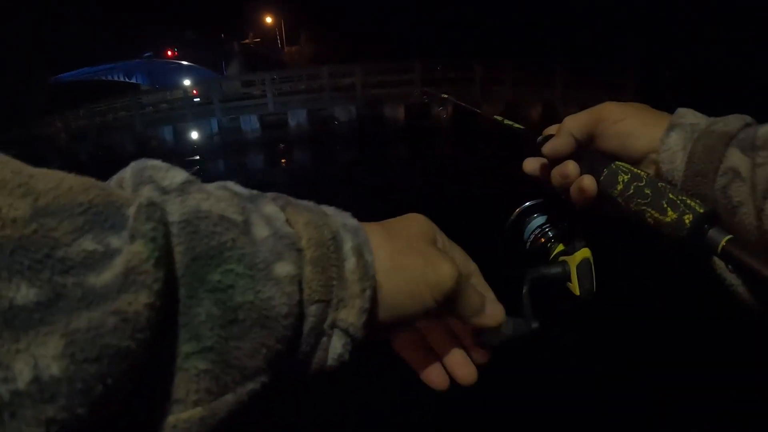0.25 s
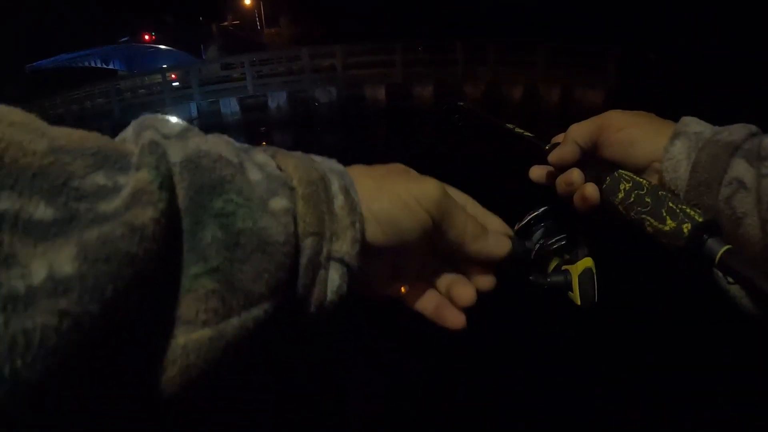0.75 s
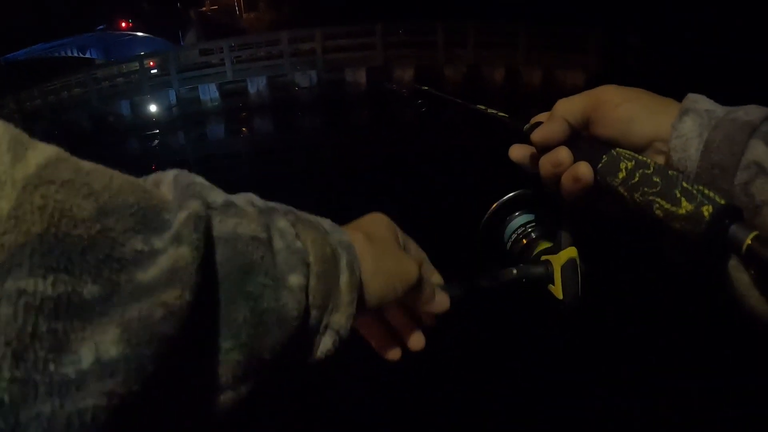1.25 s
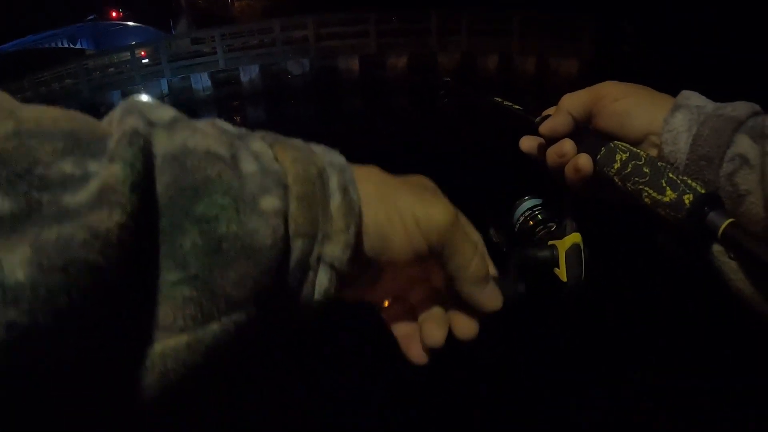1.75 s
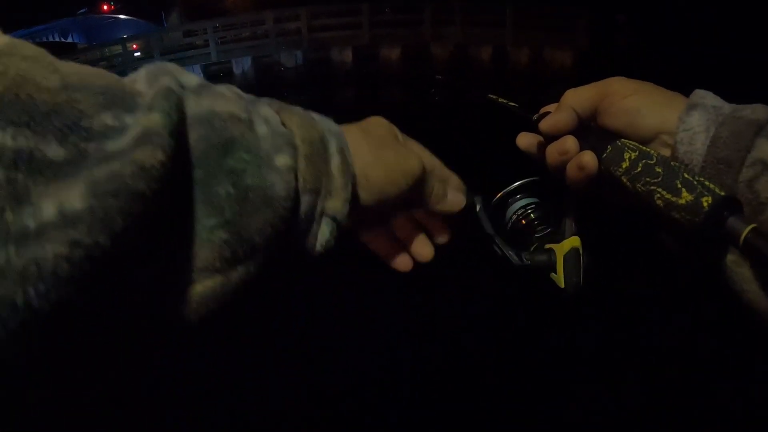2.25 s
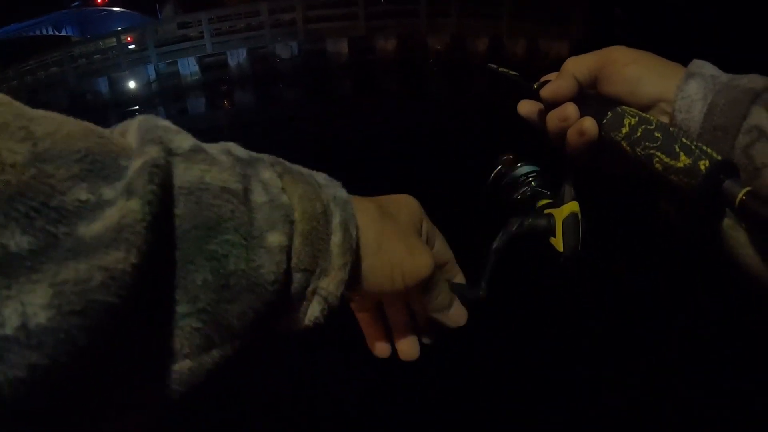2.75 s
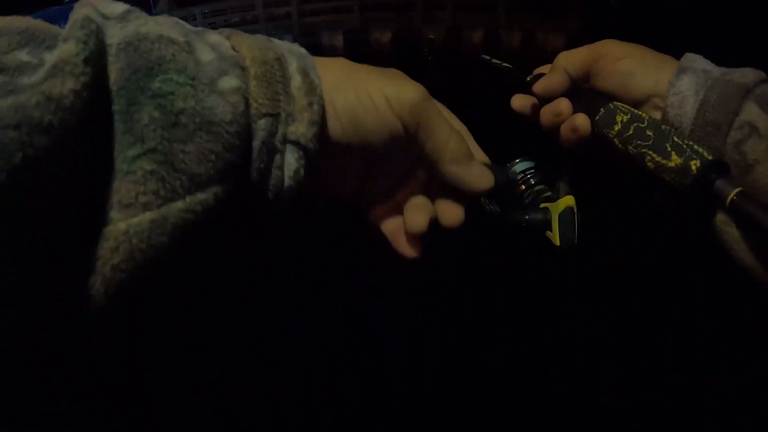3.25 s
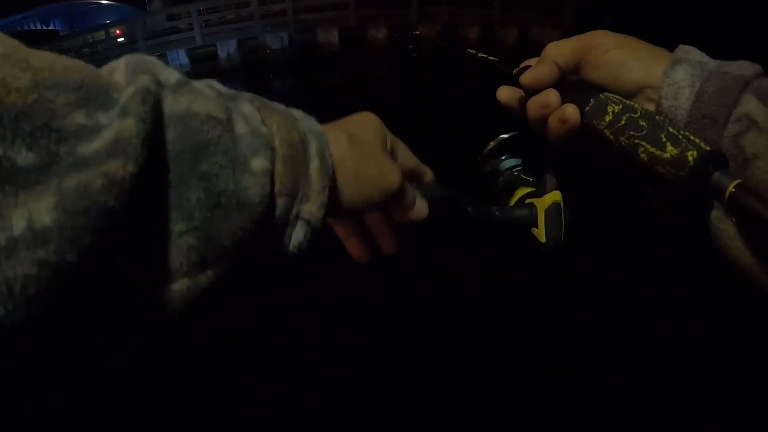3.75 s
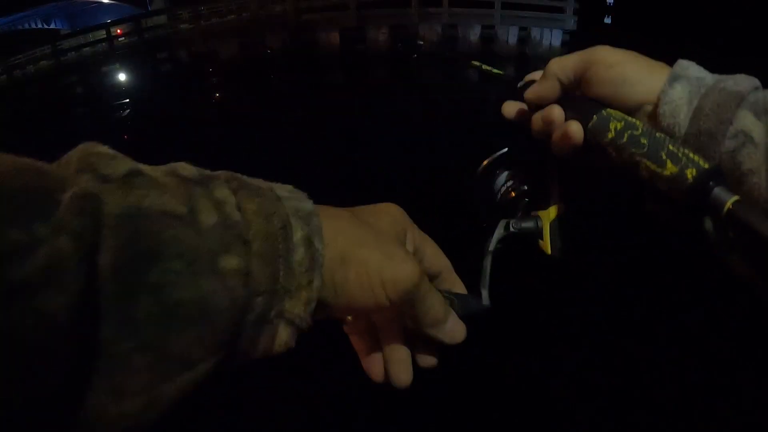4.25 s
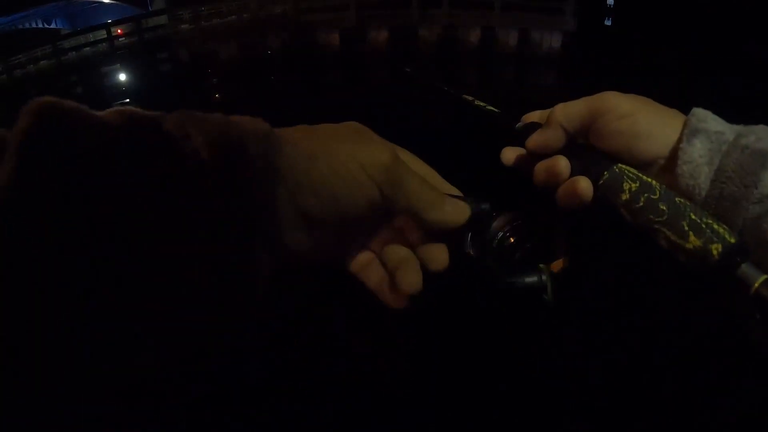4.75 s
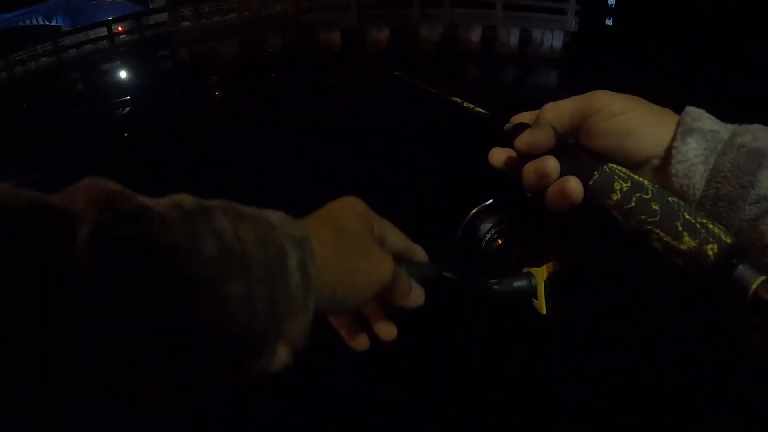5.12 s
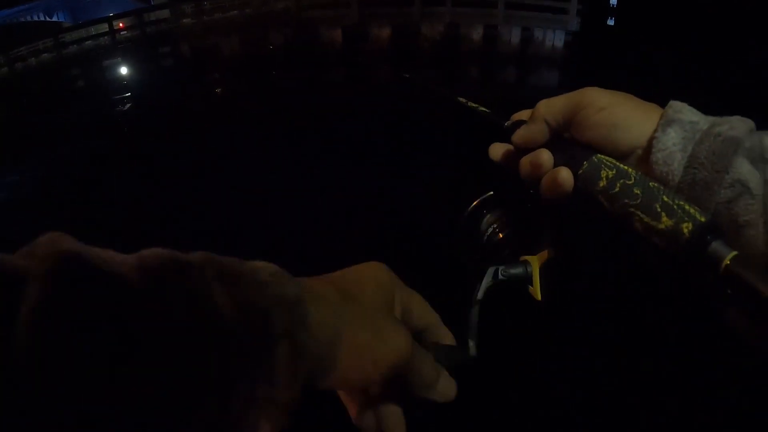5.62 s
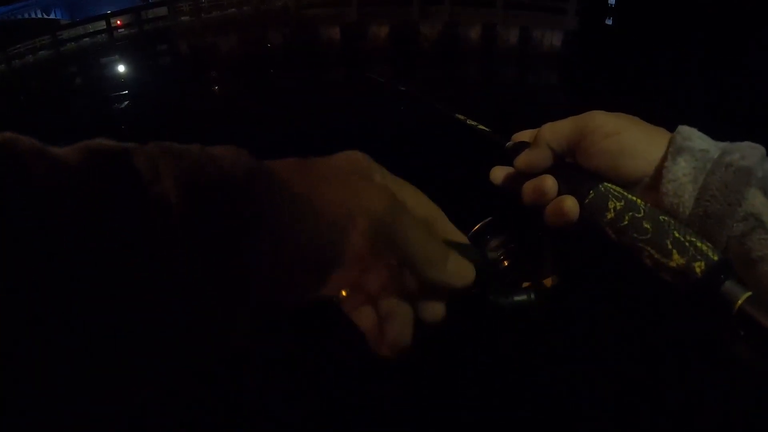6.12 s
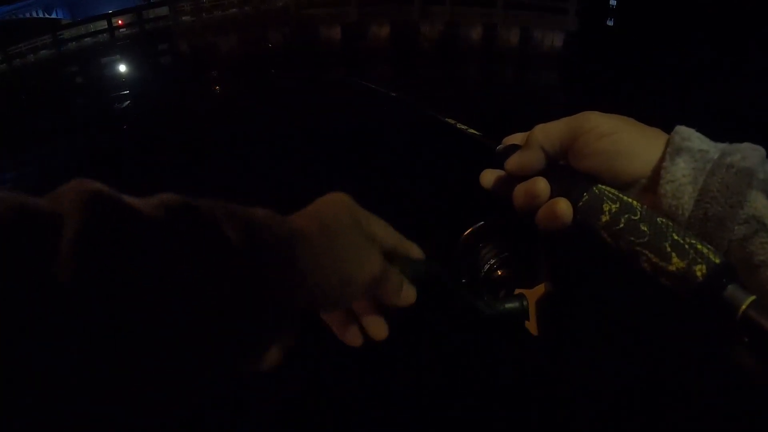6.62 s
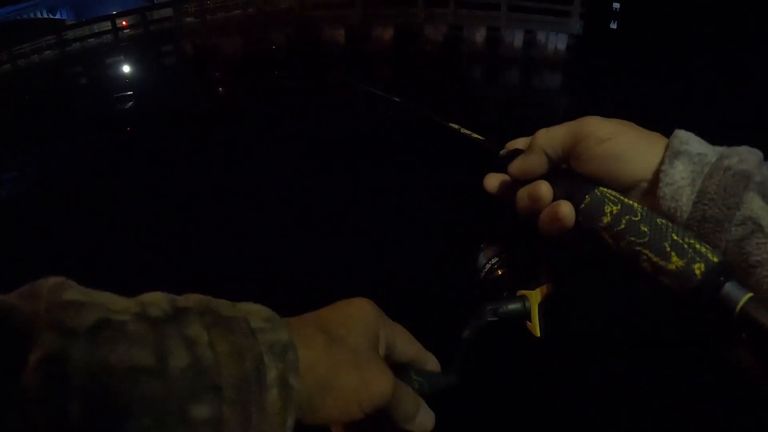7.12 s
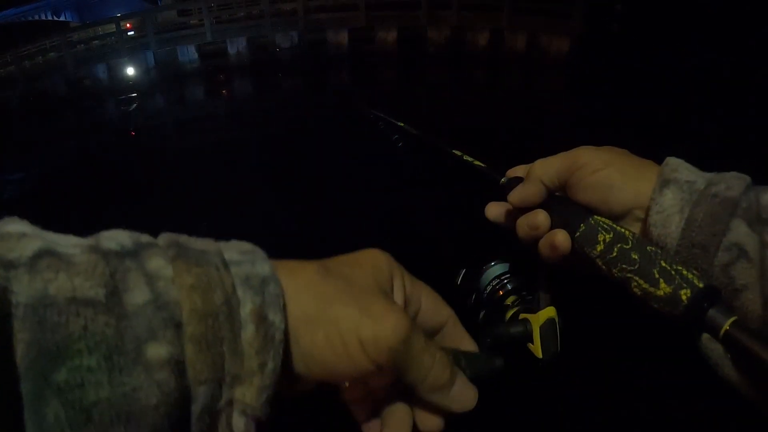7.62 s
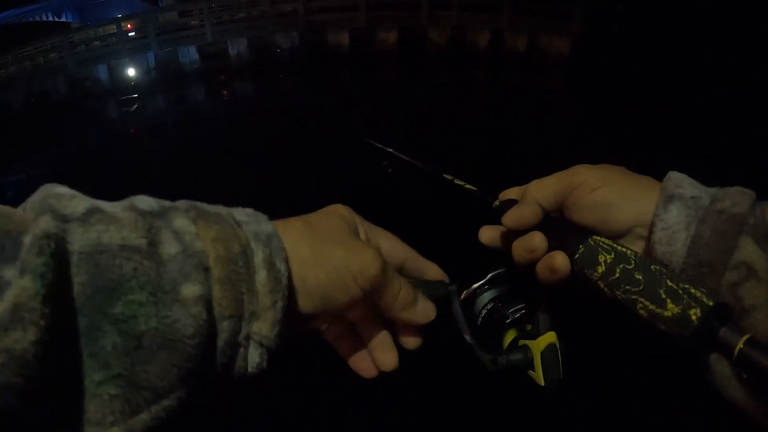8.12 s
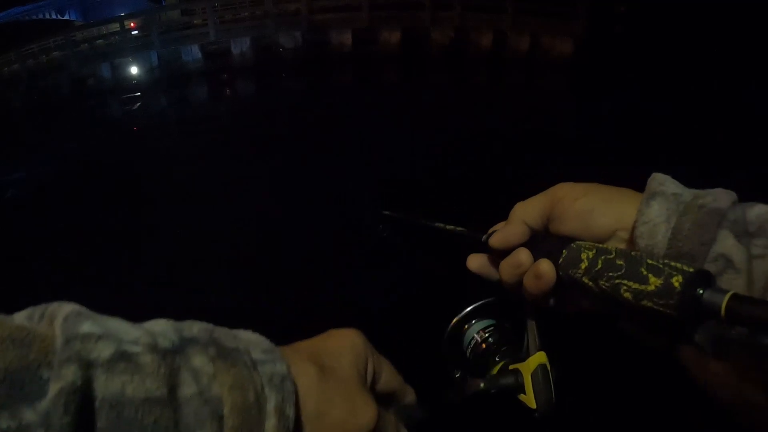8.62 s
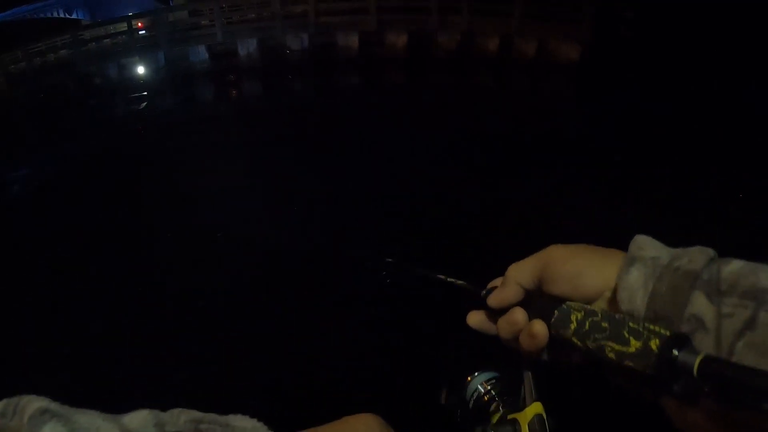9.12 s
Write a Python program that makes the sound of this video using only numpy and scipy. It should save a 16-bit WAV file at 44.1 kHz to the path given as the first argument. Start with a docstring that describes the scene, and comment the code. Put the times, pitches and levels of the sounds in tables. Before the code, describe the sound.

Outdoors at night near water, heard from a microphone worn close to the hands. A faint distant bass rumble runs throughout. At 0-0.3 s a sleeve brushes softly; small dry clicks follow between 0.25 and 0.73 s, with a tiny stir of line near 0.66. At about 0.8 s the reel catches and a bright grainy rasp runs without stopping to the end near 9.4 s. It pulses with each rotor turn, four to five times a second at first, slowing to roughly three or four after 6 s. A hollow ring around 2 kHz is fuller at about 0.8-1.8, 3.1-4.6, 6-7.6 and after 9.2 s, thin between. Soft, very low bumps come irregularly, around 1, 2.3, 2.9, 4, 6.8, 7.5, 8.3, 8.6 and 9.2 s, with lumpy arm rumble. From about 7.8 s a low humming whirr creeps up underneath.

```python
"""Winding a spinning reel

A fishing reel is wound steadily at night by the water, close to a microphone worn on the body.
The line rasps onto the spool: noise from tiny slips, with peaks and dips that sweep at every rotor turn.
A hollow ring, made by resonant shaping of similar slips, comes and goes as the spool slides in and out.
Filtered noise gives the far rumble, the arm's sway, a sleeve and a late low whirr; decaying sines give
small clicks, and short swells of low sine give the soft bumps."""
import sys
import numpy as np
from scipy import signal
from scipy.io import wavfile
from scipy.ndimage import uniform_filter1d

SR = 44100
rng = np.random.default_rng(int(sys.argv[2]) if len(sys.argv) > 2 else 0)


def digitize_waveform(pressure):
    """Quantize a signal to 16-bit integers and store it at the path in sys.argv[1].

    Rows of a 2-D input are taken as channels; values are limited to [-1, 1].
    """
    field = np.atleast_2d(pressure).T
    bounded = np.clip(field, -1, 1)
    quanta = np.round(bounded * 32767).astype(np.int16)
    wavfile.write(sys.argv[1], SR, quanta)


N = 412776
TIME = np.arange(N) / SR
# the slow changes of the reel are counted from this moment
MIDWAY_S = 5


def gain_of(db):
    """Turns decibels into an amplitude factor."""
    return 10 ** (np.asarray(db) / 20)


def evened(x):
    """Scales to an rms (average strength) of 1."""
    return x / np.sqrt(np.mean(x ** 2) + 1e-20)


def read(points, hz):
    """Reads a curve over frequency, joined on a log-frequency axis, as a column."""
    f, value = np.transpose(points)
    return np.interp(np.log(hz + 1), np.log(f + 1), value)[:, None]


def follow(rows, t):
    """Reads the columns of a curve over time at the times t."""
    s, *columns = np.transpose(rows)
    return [np.interp(t, s, c) for c in columns]


def bells(rows, hz):
    """Adds up rounded peaks and dips in dB over frequency, as a column."""
    return sum(db * np.exp(-((hz - f) / width) ** 2) for f, width, db in rows)[:, None]


def spectra(x, size):
    """Cuts a sound into short overlapping spectra: frequencies in Hz, times in s, values."""
    return signal.stft(x, SR, nperseg=size, noverlap=size * 3 // 4)


def sound(z):
    """Joins short spectra back into a sound of rms 1."""
    size = 2 * (z.shape[-2] - 1)
    _, x = signal.istft(z, nperseg=size, noverlap=size * 3 // 4)
    return evened(x[..., :N])


def wander(count, size):
    """A slow random curve of rms 1, averaged twice over size steps."""
    once = uniform_filter1d(rng.standard_normal(count), size)
    return evened(uniform_filter1d(once, size))


def ports(z, hz, same, pan, lead=0):
    """Mixes two unrelated spectra into a partly alike left and right pair, as at two microphone ports."""
    likeness = np.clip(read(same, hz), 0, 1)
    # half of the level and phase difference goes to each side
    tilt = gain_of(read(pan, hz) / 2) * np.exp(.5j * lead)
    left = z[0] * tilt
    right = (np.sqrt(likeness) * z[0] + np.sqrt(1 - likeness) * z[1]) / tilt
    return np.array([left, right])


def reel_pair(z, hz):
    """Places the reel between left and right, differently at each frequency."""
    # how alike the two sides are: (frequency [Hz], likeness [0-1])
    reel_same = [(900, 0.42), (1400, 1), (2000, 1), (2400, 0.82), (2650, 0.22), (3100, 0.82), (5000, 0.94),
                 (5400, 0.13), (5800, 0.62), (7200, 1), (8200, 0.26), (10000, 0.23), (11000, 0.27),
                 (14000, .15)]
    # level difference: (frequency [Hz], left minus right [dB])
    reel_pan = [(900, -1.5), (2000, -1.5), (2600, -6), (3300, -2.5), (4500, -1), (5200, 0), (5500, -1.5),
                (6500, -5), (7500, 2.5), (9000, -4), (11500, 2.5), (14000, -1)]
    # phase difference: (frequency [Hz], lead of the left side [rad])
    reel_lead = [(900, -.6), (1400, -.5), (2000, -1.03), (2450, -1.4), (2750, -.1), (3300, -.4),
                 (4500, -.55), (5200, -.8), (5500, 0), (7000, -.2), (10500, -.5), (11500, .6), (14000, .3)]
    return ports(z, hz, reel_same, reel_pan, read(reel_lead, hz))


def slips(per_s, spread_db, smooth):
    """Friction: tiny slips of uneven size at random moments, over a smooth hiss."""
    size = gain_of(spread_db * np.minimum(rng.exponential(1, (2, N)), 4))
    size = size * rng.choice([-1, 1], (2, N))
    happens = rng.random((2, N)) < per_s / SR
    return evened(size * happens) + smooth * rng.standard_normal((2, N))


def winding(t, usual_turns_per_s=4):
    """The rotor's motion: turns done, and the speed in doublings above the usual one."""
    # progress of the winding: (time [s], turns done [turns])
    rotor = [(0.76, 0), (0.978, 1), (1.485, 4), (2.152, 7), (2.538, 9), (3.624, 14), (4.112, 16),
             (5.153, 21), (6.689, 27), (7.864, 31), (8.391, 33), (8.693, 34), (9.38, 36)]
    s, turns = np.transpose(rotor)
    speed = np.interp(t, (s[1:] + s[:-1]) / 2, np.diff(turns) / np.diff(s))
    return np.interp(t, s, turns), np.log2(speed / usual_turns_per_s)


def tension(stir_db, extra_db):
    """Gain of the line's friction: a brief stir, a pause, then it catches and any extra level dies away."""
    stir_s, stir_length_s = 0.657, 0.041
    catch_s, catch_rise_s, settle_s = .785, .017, .08
    stir = gain_of(stir_db) * np.exp(-((TIME - stir_s) / stir_length_s) ** 2)
    age = np.maximum(TIME - catch_s, 0)
    caught = np.minimum(age / catch_rise_s, 1) * gain_of(extra_db * np.exp(-age / settle_s))
    return stir + caught


def line_rasp(rasp_db=-45.5, flutter_db=0.68, patchy_db=3.0, crackle_db=1.8):
    """The line slips over roller and spool lip; the circling bail sweeps peaks and dips through its sound."""
    # basic colour of the rasp: (frequency [Hz], level [dB per Hz])
    rasp = [(300, -25), (900, -6), (1200, 2.5), (1700, 5.5), (2300, 9), (2750, 5.5), (3300, 8.3),
            (4300, 11.8), (4900, 16.2), (5800, 7.8), (7200, 10.4), (8100, -3.8), (12400, -14.3),
            (14200, -22.5)]
    # peaks and dips that stay put: (frequency [Hz], width [Hz], height [dB])
    body = [(1345, 60, 6), (1455, 45, -5), (1535, 40, 3), (2330, 170, 8), (2680, 130, -5),
            (5390, 230, -8.5), (9200, 400, -4), (9900, 250, 2), (11048, 195, -8), (12948, 177, -9)]
    # peaks and dips that pass in every turn: (place [turns, 0-1], length [turns], frequency [Hz],
    # glide [Hz per turn], width [Hz], height [dB])
    sweeps = [(0, .2, 1450, 0, 400, 3), (.93, .2, 2200, 0, 320, 4), (.95, .18, 2880, -290, 270, -8),
              (.49, .19, 3280, -150, 175, 10.5), (.81, .14, 3630, 800, 230, 8.5),
              (.04, .15, 3610, -470, 200, -8), (.78, .12, 4200, 660, 250, -7),
              (.58, .14, 4345, 0, 140, 4.5), (.46, .13, 4523, 50, 120, -4.8),
              (.99, .2, 4760, -2700, 560, 8), (.24, .11, 4925, -2200, 280, -8),
              (.45, .18, 5650, 460, 220, 8), (.97, .14, 5820, -190, 150, 8),
              (.47, .19, 6135, -150, 170, 7.3), (.86, .22, 6180, 4500, 650, -6.5),
              (.2, .3, 6460, 190, 170, -5.2), (.21, .12, 7180, -3500, 410, -9),
              (.78, .06, 7140, -1230, 500, -8), (.53, .1, 7490, -90, 280, -9), (.62, .2, 8700, 0, 250, 4),
              (.37, .15, 9900, -2500, 380, 4.5), (.52, .26, 11500, 0, 2500, 7)]
    # effect of winding faster: (frequency [Hz], change [dB per doubling of speed])
    speed_gain = [(1400, 11), (3400, 6), (4700, 22.5), (6400, -1.5), (10000, 4)]
    # slow change of colour: (frequency [Hz], change [dB per s])
    drift = [(1400, .5), (2300, 1), (3300, -0.38), (4000, 0.42), (4750, 1.73), (5300, 1.9), (5800, -1.3),
             (6400, -1.75), (7300, -1.14), (8000, -0.46), (10000, 0), (12500, -0.2)]
    # slow level changes besides those from the speed: (time [s], level [dB])
    rasp_level = [(0.97, -1.0), (1.32, 1.7), (1.93, -1.6), (2.14, 1.1), (2.75, 1.2), (2.97, -1.1),
                  (5.16, -0.2), (5.41, 1.3), (6.43, -0.8), (6.98, 1.4), (7.86, -0.6), (9.04, -0.2)]

    hz, t, z = spectra(slips(per_s=2200, spread_db=1.5, smooth=0.44), size=512)
    turn, speed = winding(t)
    colour = read(rasp, hz) + bells(body, hz)
    for place, length, f, glide, width, db in sweeps:
        # turns since the nearest passing, from -0.5 to 0.5
        past = (turn - place + .5) % 1 - .5
        off_centre = (hz[:, None] - f - glide * past) / width
        colour = colour + db * np.exp(-(past / length) ** 2 - off_centre ** 2)
    colour += read(speed_gain, hz) * speed
    colour += read(drift, hz) * (t - MIDWAY_S)
    colour += follow(rasp_level, t)[0]
    # line tension is never quite even
    colour += flutter_db * evened(uniform_filter1d(rng.standard_normal(len(t)), size=7))
    # single snags show most in the treble: (frequency [Hz], share)
    treble = read([(7400, 0.12), (8400, 0.68)], hz)
    snags = uniform_filter1d(rng.exponential(1, len(t)) - 1, size=3)
    colour += crackle_db * treble * evened(snags)
    # random patches, narrow in frequency and longer in time
    patches = uniform_filter1d(rng.standard_normal(colour.shape), size=2, axis=0)
    patches = uniform_filter1d(patches, size=20, axis=1)
    colour += patchy_db * evened(patches)
    friction = sound(reel_pair(z, hz) * gain_of(colour))
    return gain_of(rasp_db) * tension(stir_db=-18, extra_db=0) * friction


def spool_ring(waver_db=0.94, waver_hz=15, throb_db=1.1, throb_place=0.7, throb_hz=15):
    """Similar slips ring the hollow spool: full at one end of its stroke, thin and wide at the other."""
    # times of the full ring: (middle [s], length [s], level [dB], pitch [Hz])
    strokes = [(1.155, 1.3, -42, 2017), (3.85, 1.48, -41.5, 2015), (6.787, 1.71, -42.5, 1996),
               (9.95, 1.57, -40.5, 2220)]
    full_width_hz, stroke_edge_s = 170, 0.22
    thin_db, thin_hz, thin_width_hz, thin_rise_hz_per_s = -51.5, 2146, 292, 4.8
    speed_db = 7.5  # per doubling of speed

    hz, t, z = spectra(slips(per_s=1500, spread_db=3.0, smooth=0.49), size=1024)
    turn, speed = winding(t)
    level_db, width = thin_db, thin_width_hz
    pitch = thin_hz + thin_rise_hz_per_s * (t - MIDWAY_S)
    for middle, length, full_db, full_hz in strokes:
        # 0 is thin, 1 is full
        full = .5 + .5 * np.tanh((length / 2 - abs(t - middle)) / stroke_edge_s)
        level_db = level_db + full * (full_db - level_db)
        pitch = pitch + full * (full_hz - pitch)
        width = width + full * (full_width_hz - width)
    # it throbs a little with each turn of the rotor, and wavers by chance
    throb = np.cos(2 * np.pi * (turn - throb_place))
    pitch += throb_hz * throb + waver_hz * wander(len(t), size=12)
    level_db += speed_db * speed + throb_db * throb + waver_db * wander(len(t), size=12)
    off_pitch = (hz[:, None] - pitch) / width
    # a wide ring is spread thinner
    shape = (1 + off_pitch ** 2 / 2) ** -3. / np.sqrt(abs(width))
    level = gain_of(np.interp(TIME, t, level_db))
    return level * tension(stir_db=-15, extra_db=3.0) * sound(reel_pair(z, hz) * shape)


def clicks(click_db=0, favour_db=7):
    """Play in the handle and gears knocks the reel's modes; each knock favours those near one pitch."""
    # knocks as the hand takes the handle: (time [s], peak level [dB], favoured pitch [Hz])
    knocks = [(0.252, -44.5, 2800), (.383, -35, 4730), (.394, -53, 4500), (.619, -46.5, 2800),
              (0.687, -37, 2100), (.725, -51, 4600)]
    # ways the reel can ring: (pitch [Hz], level before favouring [dB], time to fall by 60 dB [s])
    modes = [(2070, -3.5, 0.022), (2900, -3, 0.0077), (3700, -4, 0.0069), (4350, -11, .014),
             (4630, 1, 0.0097), (6540, -1.5, .008), (9200, -14, 0.0082)]
    t, out = np.arange(2000) / SR, np.zeros(N)
    for s, db, pitch in knocks:
        ring = 0
        for hz, level, t60 in modes:
            near = np.exp(-((hz - pitch) / 600) ** 2)
            fade = gain_of(level + favour_db * near - 60 * t / t60)
            ring = ring + fade * np.sin(2 * np.pi * (hz * t + rng.random()))
        out[round(s * SR):][:len(t)] += gain_of(db + click_db) * ring / abs(ring).max()
    return out


def bumps(bump_db=-1, rise_s=0.023, lead_s=0.0016):
    """Each soft bump of the arm rocks the microphone for a few low cycles, the left a little ahead."""
    # the bumps: (time [s], level before bump_db and the side gains [dB], pitch [Hz])
    rocks = [(0.985, -32.5, 38), (2.264, -29, 45), (2.87, -26, 26.9), (3.642, -36.5, 72),
             (3.973, -33, 35.0), (6.706, -29.5, 27.5), (6.854, -28.5, 31), (7.525, -24.5, 62),
             (8.256, -25, 30), (8.578, -24, 28.6), (9.241, -30, 28)]
    out = np.zeros((2, N))
    for s, db, hz in rocks:
        age = np.maximum(TIME - s + lead_s * np.array([[.5], [-.5]]), 0)
        # a swell that is fullest after rise_s
        swell = (age / rise_s) ** 2 * np.exp(2 - 2 * age / rise_s)
        out += gain_of(db + bump_db) * swell * np.sin(2 * np.pi * hz * age)
    # the right side is 2 dB louder
    return out * gain_of([[-1], [1]])


def wash(spectrum, level, trim_db, peaks=()):
    """Broad noise, coloured by a spectrum, that follows a level curve."""
    # how alike the two sides are: (frequency [Hz], likeness [0-1])
    air_same = [(30, 0.96), (70, 1), (130, 0.94), (260, 0.93), (500, 0.5), (1000, 0.45), (4000, 0.13),
                (12000, 0.11)]
    # level difference: (frequency [Hz], left minus right [dB])
    air_pan = [(25, -3.3), (60, -1.1), (125, .8), (250, 1.8), (500, 2.2), (2000, 0)]
    hz, t, z = spectra(rng.standard_normal((2, N)), size=4096)
    colour = read(spectrum, hz)
    if len(peaks):
        colour = colour + bells(peaks, hz)
    noise = sound(ports(z, hz, air_same, air_pan) * gain_of(colour))
    return gain_of(trim_db + follow(level, TIME)[0]) * noise


def sway(sway_db=-3.0, lump_db=4, lump_s=.12):
    """Deep rumble of the microphone moving with the arm: low noise in uneven lumps."""
    # colour of the rumble: (frequency [Hz], level [dB per Hz])
    sway_colour = [(8, -15.5), (25, 0), (65, -8.5), (130, -17), (400, -83), (2000, -100)]
    # strength of the sway before sway_db and the lumps: (time [s], level [dB])
    sway_level = [(0.0, -50), (2.64, -51.5), (2.88, -40.4), (3.6, -49.5), (5.28, -37.5), (5.52, -44.5),
                  (7.44, -38), (8.16, -48), (8.4, -39.5), (9.36, -44.4)]
    s = np.arange(0, N / SR + lump_s, lump_s)
    # dips may go deeper than rises
    lumps = np.interp(TIME, s, np.clip(rng.standard_normal(len(s)), -2, 1))
    return gain_of(lump_db * lumps) * wash(sway_colour, sway_level, sway_db)


def low_whirr():
    """A low whirr that comes up late: noise with a few humming peaks."""
    # colour: (frequency [Hz], level [dB per Hz])
    whirr = [(150, -29), (300, -3), (480, -5), (750, -5), (950, -11), (1350, -4), (1900, -2), (2800, -7.5),
             (5000, -57), (9000, -70)]
    # peaks and a dip: (frequency [Hz], width [Hz], height [dB])
    whirr_peaks = [(476, 23, 12.5), (626, 24, 12.5), (1295, 54, 4), (1550, 19, -4)]
    # level before the trim: (time [s], level [dB])
    whirr_level = [(0, -100), (7.3, -85), (7.8, -60.5), (8.2, -55.5), (8.8, -53.5), (9.36, -51.5)]
    return wash(whirr, whirr_level, trim_db=2.5, peaks=whirr_peaks)


def sleeve_brush():
    """A short brush of the sleeve at the start: a swell of noise that soon fades."""
    # colour: (frequency [Hz], level [dB per Hz])
    sleeve = [(300, -7), (1000, 4), (3000, -3), (6500, -1), (9000, -11), (14000, -14)]
    # level before the trim: (time [s], level [dB])
    sleeve_level = [(0, -72), (.12, -63.5), (.21, -58), (.26, -64), (.3, -79), (.5, -100)]
    return wash(sleeve, sleeve_level, trim_db=-2)


def night_air():
    """Far rumble and air: noise, strongest in the bass, that slowly changes in level."""
    # colour: (frequency [Hz], level [dB per Hz])
    air = [(15, -2), (30, -9), (60, -7), (120, -8), (200, -10), (310, -13.5), (450, -20), (650, -28),
           (900, -38.5), (1500, -37.5), (3000, -48.5), (7000, -47.5), (10000, -55), (14500, -65)]
    # level before the trim: (time [s], level [dB])
    air_level = [(0.0, -47.5), (1.68, -48), (1.92, -46.5), (3.84, -49.5), (4.8, -48.5), (5.52, -50),
                 (6.72, -51.5), (9.36, -47.5)]
    return wash(air, air_level, trim_db=4.5)


def scene():
    """The reel in front, the moving arm and the night air around it."""
    # the rasp and ring drift very slowly to the left, by 0.02 dB per s
    drift = gain_of(-0.02 * (TIME - MIDWAY_S) * np.array([[-.5], [.5]]))
    reel = drift * (line_rasp() + spool_ring()) + clicks()
    arm = bumps() + sway() + sleeve_brush()
    return reel + arm + low_whirr() + night_air()


def record(dry):
    """The microphone's upper limit: a steep filter takes away what lies above 14500 Hz."""
    low_pass = signal.firwin(401, 14500, window=("kaiser", 9), fs=SR)
    return signal.oaconvolve(dry, low_pass[None], "same")


dry = scene()
out = record(dry)
digitize_waveform(out)
```